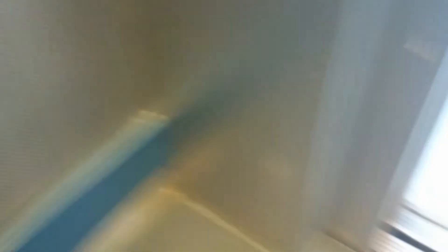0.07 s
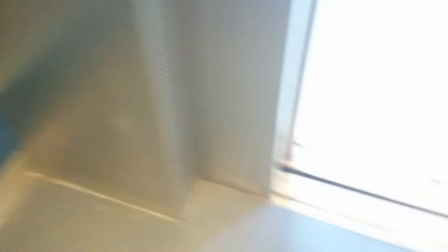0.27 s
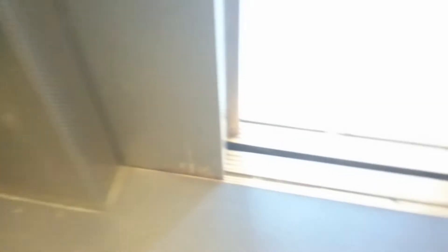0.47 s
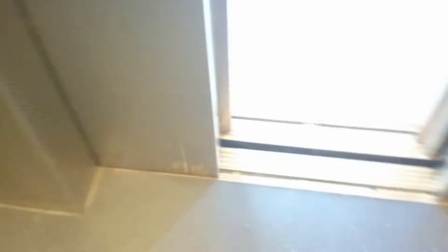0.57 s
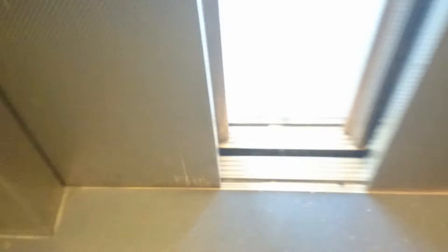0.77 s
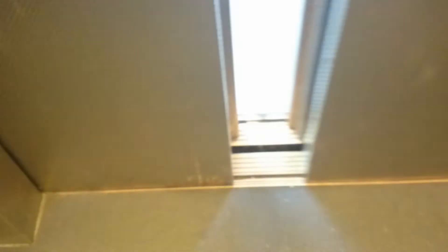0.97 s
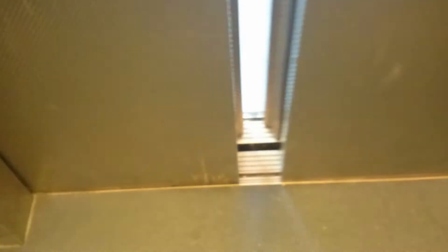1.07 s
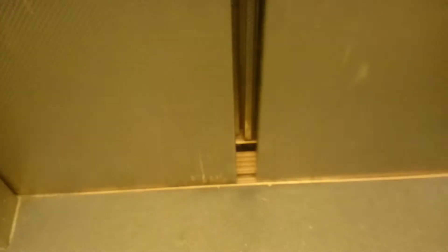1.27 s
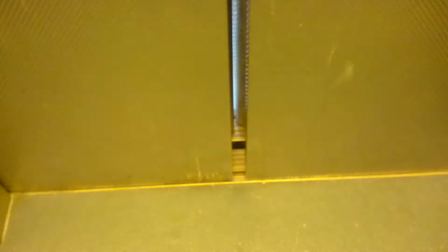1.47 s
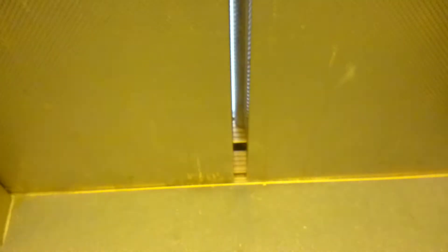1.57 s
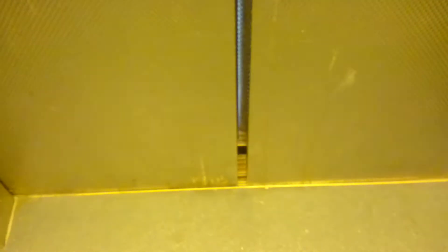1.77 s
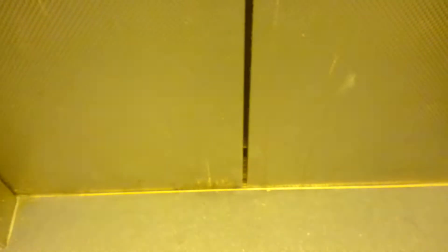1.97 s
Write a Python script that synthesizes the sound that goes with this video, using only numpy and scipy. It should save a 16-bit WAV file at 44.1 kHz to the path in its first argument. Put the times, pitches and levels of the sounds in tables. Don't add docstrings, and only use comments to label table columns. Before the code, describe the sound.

Steel elevator doors roll closed, ticking and scraping, lock with a loud clunk, then thud and settle

```python
import sys
import numpy as np
from scipy import signal
from scipy.fft import rfft, irfft
from scipy.io import wavfile
from scipy.ndimage import uniform_filter1d

SR = 44100
rng = np.random.default_rng(int(sys.argv[2]) if len(sys.argv) > 2 else 0)


def put_to_file(sound):
    columns = np.atleast_2d(sound).T
    safe = np.clip(columns, -1, 1)
    whole_steps = np.round(safe * 32767)
    wavfile.write(sys.argv[1], SR, whole_steps.astype(np.int16))


def to_linear_factor(level_db):
    exponent = np.asarray(level_db, float) / 20
    return 10 ** exponent


N = 89390
T = np.arange(N) / SR
HZ = np.fft.rfftfreq(N, 1 / SR)
WHITE = [(100, 0), (200, 0)]


def read_colour(points, hz):
    f, v = np.transpose(points)
    return np.interp(np.log(hz + 1), np.log(f + 1), v)


def over_time(curve, col=-1):
    points = np.array(curve)
    return np.interp(T, points[:, 0], points[:, col])


def evened(x):
    return x / np.sqrt(np.mean(x ** 2) + 1e-20)


def field(colour, tilt_db=0., grain=1, streak_db=0.):
    # frequency in Hz, left-right likeness from 0 to 1.
    likeness = [(40, 0.82), (130, 0.8), (290, 0.83), (640, 0.67), (1400, 0), (3000, 0.08)]
    streak_hz = 68.2
    a, b = rfft(rng.standard_normal((2, N)) * grain)
    same = np.clip(read_colour(likeness, HZ), 0, 1)
    right = same * a + np.sqrt(1 - same ** 2) * b
    modes = evened(uniform_filter1d(rng.standard_normal(len(HZ)), max(int(streak_hz / HZ[1]), 1)))
    octaves = np.log2(HZ / 2000 + 1e-3)
    gain_db = read_colour(colour, HZ) + tilt_db * octaves + streak_db * modes
    return evened(irfft(np.array([a, right]) * to_linear_factor(gain_db) * (HZ > 30), N))


def wander(rate_hz, depth_db):
    z = rfft(rng.standard_normal(N)) / (1 + (HZ / rate_hz) ** 2)
    return to_linear_factor(depth_db * evened(irfft(z, N)))


def strike(start_s, rise_s, t60_s):
    t = np.maximum(T - start_s, 0)
    return np.minimum(t / max(rise_s, 1e-4), 1) * to_linear_factor(-60 * t / max(t60_s, .01))


def resonate(x, hz, width_hz):
    turn = np.exp(2j * np.pi * np.cumsum(hz * np.ones(N)) / SR)
    r = np.exp(-np.pi * width_hz / SR)
    return 2 * (turn * signal.lfilter([1 - r], [1, -r], x / turn)).real


def car_sway():
    # time in seconds, level in dB.
    swell = [(0.0, -35), (0.29, -39), (0.38, -33.5), (0.43, -38), (0.45, -40), (0.82, -50), (1.27, -46),
             (1.29, -67), (1.5, -43), (1.57, -43), (1.69, -38), (1.74, -39), (1.79, -38.5), (1.84, -38.5),
             (2.0, -50.5), (2.02, -35.5)]
    # frequency in Hz, level in dB.
    low = [(20, -26), (33, -5), (50, 8), (65, 3), (85, -7.5), (130, -33)]
    return to_linear_factor(over_time(swell) + 0.1) * field(low)


def motor_whine():
    # time in seconds, pitch in Hz, level in dB.
    whine = [(0, 705, -71), (.3, 726, -59), (.64, 720, -55), (.71, 712, -49.5), (.81, 716, -46.5),
             (.9, 723, -48), (1.02, 713, -45.5), (1.08, 708, -48), (1.2, 687, -69)]
    hz = over_time(whine, col=1)
    phase = 2 * np.pi * np.cumsum(hz * wander(20, 0.032)) / SR
    line = np.sin(phase) * wander(25, 1.9)
    skirt = evened(resonate(field(WHITE), hz, 36.0))
    return to_linear_factor(over_time(whine)) * (line + 0.74 * skirt)


def rollers():
    # time in seconds, level in dB.
    roll = [(0.0, -34.5), (.1, -34.5), (.2, -37.5), (0.34, -43.5), (.5, -45), (.64, -39.5), (.7, -48),
            (0.78, -44), (1.03, -46), (1.16, -38), (1.33, -31.5), (1.46, -26.5), (1.52, -30), (1.88, -37.5),
            (2.02, -44.5)]
    # frequency in Hz, level in dB.
    body = [(60, 2), (110, 0), (200, 1), (400, -5.5), (750, -10.5), (1300, -16.5), (2500, -20.5),
            (5000, -57)]
    return to_linear_factor(over_time(roll)) * field(body, grain=wander(36, 1.4))


def shoe_hiss():
    # time in seconds, level in dB.
    friction = [(0.0, -36.5), (.04, -40.5), (.27, -43.5), (.31, -41), (.36, -40.5), (0.45, -37.5),
                (0.64, -42.5), (0.89, -45.5), (1.05, -45.5), (1.22, -44), (1.51, -45.5), (1.67, -57),
                (1.73, -52), (2.02, -56)]
    # frequency in Hz, level in dB.
    hiss = [(150, -13), (600, -1), (1500, -2), (3000, -1), (5000, 0.5), (6500, -5.5), (9000, -20),
            (16000, -17)]
    rub = field(hiss, grain=wander(120, 1.0), streak_db=1.5)
    return to_linear_factor(over_time(friction) + 2.0) * rub * wander(15, 0.97)


def grit_ticks():
    # start in seconds, level in dB, 60 dB decay in seconds, tilt in dB per octave.
    ticks = [(.004, -35, 0.27, -0.5), (.08, -54, 0.11, 4), (.14, -38.5, .15, 2), (.292, -34, 0.22, 3.5),
             (.36, -50, 0.11, 4), (0.419, -33.5, 0.41, 0.5), (0.599, -38, 0.24, 0), (.75, -37, 0.13, 15),
             (.91, -40.5, 0.11, 1), (1.1748, -31.5, .08, -2), (1.245, -35, 0.09, 9), (1.09, -42, .1, 2)]
    # frequency in Hz, level in dB.
    grit = [(1500, -15), (4000, 10.5), (8000, -0.5), (12000, -4.5), (16000, -1)]
    out = np.zeros((2, N))
    for start_s, db, t60_s, tilt_db in ticks:
        out += to_linear_factor(db) * strike(start_s, 0.0014, t60_s) * field(grit, tilt_db)
    return out


def bracket_rings():
    # start in seconds, level in dB, frequency in Hz, width in Hz, 60 dB decay in seconds.
    rings = [(0.86, -41, 1380, 150, .2), (0.968, -37.5, 870, 870, 0.36), (1.06, -38.5, 183, 40, 1.2),
             (0.82, -42, 580, 200, 0.55), (.6, -42, 860, 310, 0.36), (0.74, -44, 1300, 200, 0.17),
             (1.2, -38, 680, 87, 0.28), (.29, -39, 5200, 1600, 0.66), (0.478, -42, 5400, 760, .3),
             (0.89, -43, 1266, 100, 0.54), (1.025, -32, 3450, 250, 0.21), (1.09, -37.5, 1300, 150, 0.36),
             (1.09, -42, 5370, 200, 0.65), (1.3, -44, 2065, 150, 0.37), (1.18, -36.5, 4910, 320, 0.17),
             (1.3, -38, 1600, 60.4, 0.24), (1.51, -35, 2324, 86, 0.61), (1.826, -33, 544, 51, 0.26),
             (1.825, -40.5, 765, 120, 0.32), (1.62, -35.5, 500, 160, 0.47), (1.92, -46, 5030, 1100, 0.44),
             (.185, -41, 5464, 150, 0.61)]
    white = field(WHITE)
    out = np.zeros((2, N))
    for start_s, db, hz, width_hz, t60_s in rings:
        tone = evened(resonate(resonate(white, hz, width_hz), hz, width_hz))
        out += to_linear_factor(db) * strike(start_s, 0.003, t60_s) * tone
    return out


def panel_thuds():
    # start in seconds, peak in dB, frequency in Hz, rise in seconds, 60 dB decay in seconds.
    settling = [(1.052, -36.5, 180, 0.013, 1.8), (1.02, -39.5, 112, 0.053, 1.3),
                (1.454, -22.5, 103, 0.033, 1.28), (1.78, -34, 101, 0.015, 0.33),
                (1.64, -21.5, 106, 0.03, 0.38), (1.5, -20.5, 64, 0.0088, 0.26), (1.67, -26, 188, 0.01, 0.3),
                (1.82, -33.5, 170, 0.016, 0.69), (1.352, -23, 192, 0.0091, 0.28),
                (1.33, -25, 241, 0.013, 1.05), (1.4, -29.5, 327, 0.018, 0.44),
                (1.42, -30.5, 196, 0.013, 0.46), (1.312, -18, 650, 0.0089, 0.14),
                (1.296, -14.5, 482, 0.0035, .14), (1.295, -11.5, 182, 0.011, .28),
                (1.53, -29, 260, .02, 0.49), (1.303, -18, 1056, 0.0088, .15), (1.33, -25.5, 470, 0.009, .3),
                (1.15, -39, 194, .03, .8), (0.6, -41, 62, .01, 0.25), (0.5, -36, 58, 0.0095, 0.24),
                (.01, -27, 60.8, .01, 0.33), (1.2, -33, 110, 0.036, 1), (0.616, -43.5, 110, 0.027, 0.66),
                (0.394, -41, 200, .015, .3), (0.095, -40, 182, .02, .6), (0.042, -43, 290, 0.018, .4),
                (1.96, -33, 44.8, 0.018, .5), (1.44, -23, 61.9, 0.022, 0.42)]
    out = np.zeros((2, N))
    for start_s, db, hz, rise_s, t60_s in settling:
        cycles = np.cumsum(hz * wander(20.3, 0.121)) / SR + rng.random()
        tone = np.sin(2 * np.pi * cycles) * wander(40, 2.1)
        out += to_linear_factor(db) * strike(start_s, rise_s, t60_s) * tone
    return out


def coupler_knocks():
    # start in seconds, level in dB, rise in seconds, 60 dB decay in seconds,
    # tilt in dB per octave.
    hits = [(0.9685, -33.5, 0.00082, 0.25, -5), (1.0059, -27.5, 0.00087, 0.46, -1),
            (1.088, -35.5, 0.003, 0.95, -1), (1.174, -32, 0.00059, 0.26, 2),
            (1.284, -30.5, 0.0094, 0.31, 1.5), (1.2949, -6.5, 0.00055, 0.22, -0.43),
            (1.33, -23, 0.012, 0.57, -3.5), (1.485, -24, 0.024, 0.44, -0.5), (1.559, -32, .03, 0.57, -2.5),
            (1.739, -45, 0.0031, 0.21, 7), (1.2941, -10, 0.0006, 0.08, 12.5), (1.51, -32, .004, 0.34, 0),
            (1.976, -48, 0.005, 0.33, 1.5)]
    # frequency in Hz, level in dB.
    metal = [(200, -9.5), (600, -1.5), (2200, -3.5), (5000, -1), (6500, -9), (8500, -13.5), (11000, -13.5),
             (16000, -17)]
    snap_db = -5.5
    out = np.zeros((2, N))
    for start_s, db, rise_s, t60_s, tilt_db in hits:
        crack = to_linear_factor(snap_db) * strike(start_s, rise_s / 2, 30 * rise_s)
        envelope = strike(start_s, rise_s, t60_s) + crack
        out += to_linear_factor(db) * envelope * field(metal, tilt_db, wander(250, 1.3), streak_db=3.5)
    return out


def lock_clunk():
    # frequency in Hz, peak in dB, 60 dB decay in seconds.
    modes = [(172, -8, 0.38), (255, 2, 0.13), (330, -7.5, 0.5), (455, -5, 0.14), (491.7, -9, 0.59),
             (720, -13, 0.14), (799, -8, 0.19), (962, -8, 0.22), (1061, -0.5, 0.12), (1884, 4.5, 0.11),
             (1470, -6, 0.085), (4355, -2, 0.13), (5350, -19, 0.066), (541, -7, 0.1)]
    lock_s, lock_db, rattle_s = 1.2945, -14.5, 0.0076
    rattle = field(WHITE) * strike(lock_s, 0.00098, 7 * rattle_s)
    out = np.zeros((2, N))
    for hz, db, t60_s in modes:
        ring = resonate(rattle, hz * wander(36, 0.14), 2.37 / t60_s)
        out += to_linear_factor(db) * ring / abs(ring).max(axis=1, keepdims=True)
    return to_linear_factor(lock_db) * out


def scene():
    moving = car_sway() + motor_whine() + rollers() + shoe_hiss() + grit_ticks()
    return moving + bracket_rings() + panel_thuds() + coupler_knocks() + lock_clunk()


def low_pass(x):
    return signal.sosfilt(signal.butter(12, 15750, fs=SR, output="sos"), x)


def record(dry):
    # frequency in Hz, width in Hz, gain in dB.
    left_port = [(4530, 1100, 3.5), (10200, 1950, 4), (13540, 2830, -15.5), (14900, 690, -16),
                 (6280, 1200, -7)]
    # frequency in Hz, width in Hz, gain in dB.
    right_port = [(5290, 1310, 9.5), (10040, 3800, -8.5), (15200, 2400, -2.5), (11700, 1700, -5),
                  (6460, 2000, 0)]
    left_db, left_bass_db, ceiling = -1.5, -5.5, 1.1
    port_db = np.zeros((2, len(HZ)))
    for side, port in enumerate((left_port, right_port)):
        for hz, width_hz, gain_db in port:
            port_db[side] += gain_db / (1 + (2 * (HZ - hz) / width_hz) ** 2)
    lean_db = (left_db + left_bass_db / (1 + HZ / 150)) / 2
    mix = irfft(rfft(dry) * to_linear_factor(port_db + np.array([lean_db, -lean_db])), N)
    mix = ceiling * np.tanh(mix / ceiling)
    mix = mix * np.minimum((T[-1] - T) / 0.0022, 1)
    mix = irfft(rfft(mix) * (HZ < 15800), N)
    return low_pass(mix)


dry = scene()
out = record(dry)
put_to_file(out)
```